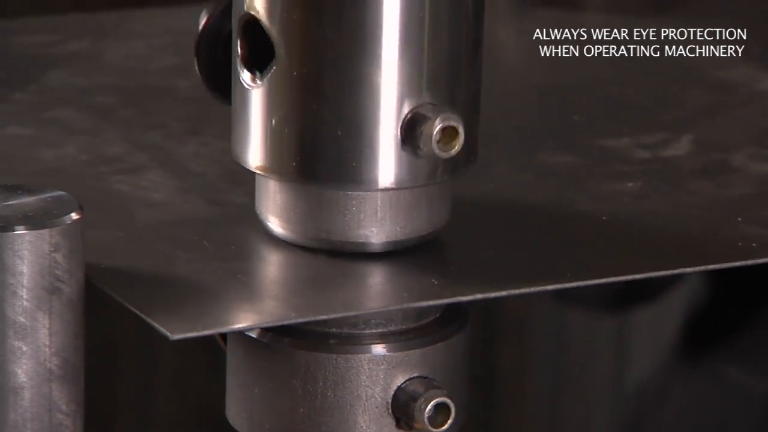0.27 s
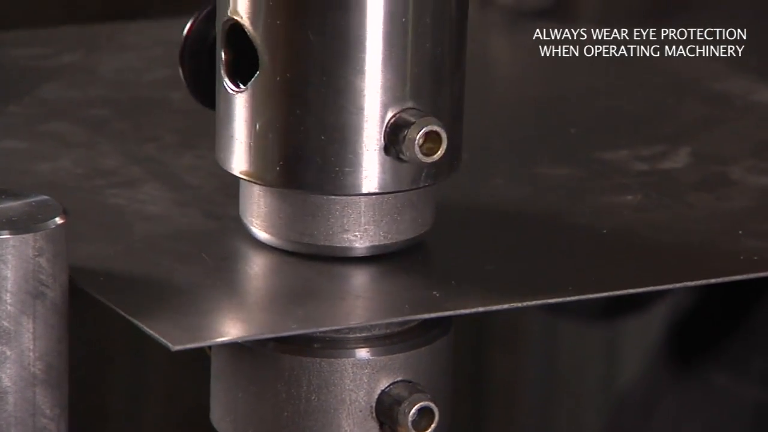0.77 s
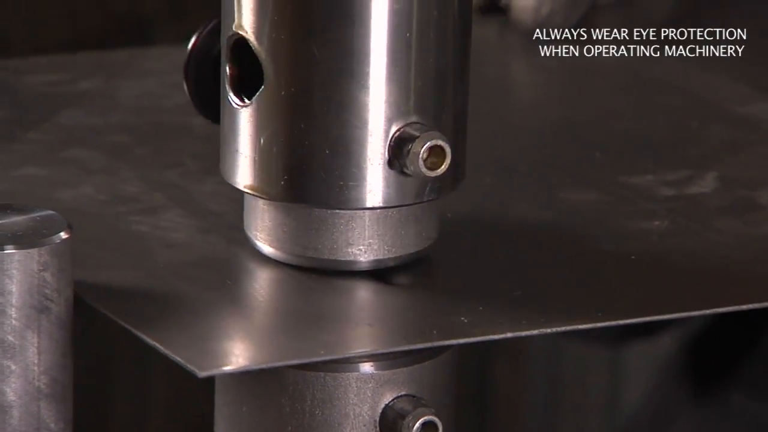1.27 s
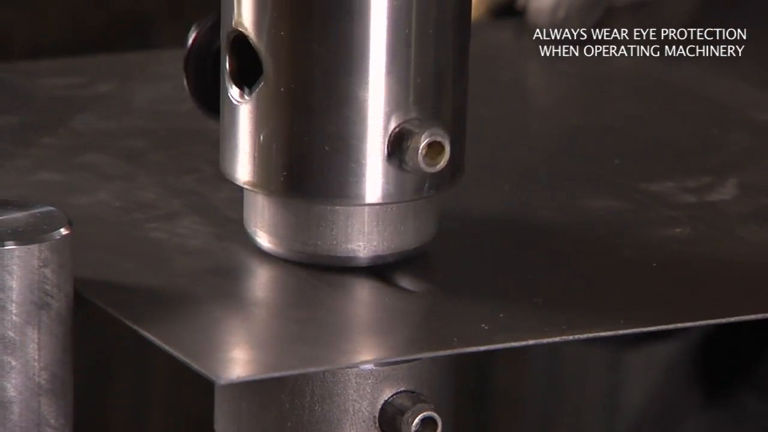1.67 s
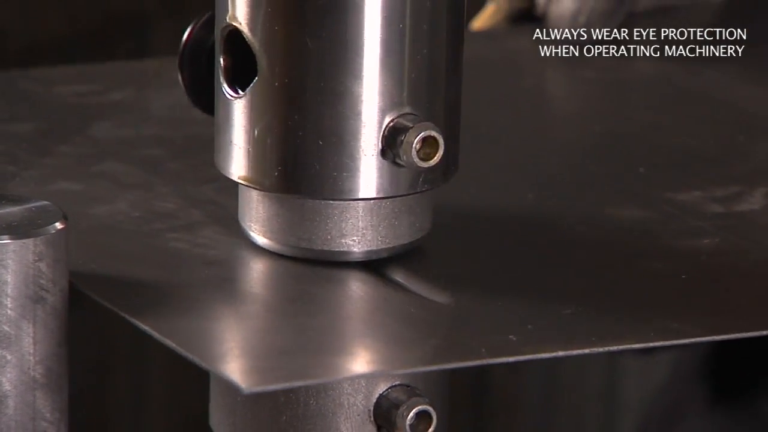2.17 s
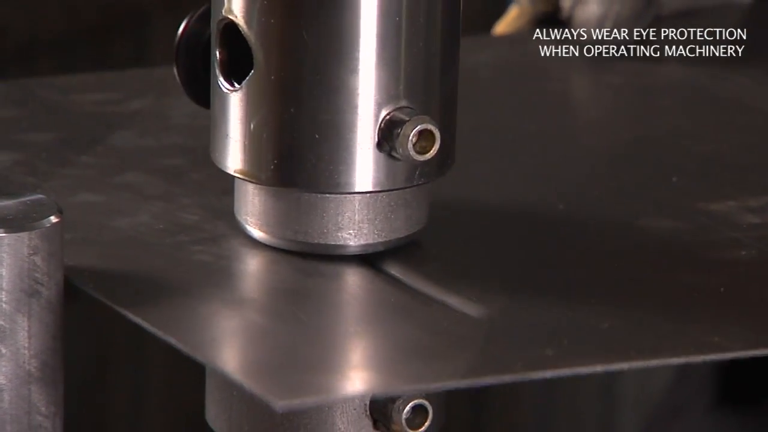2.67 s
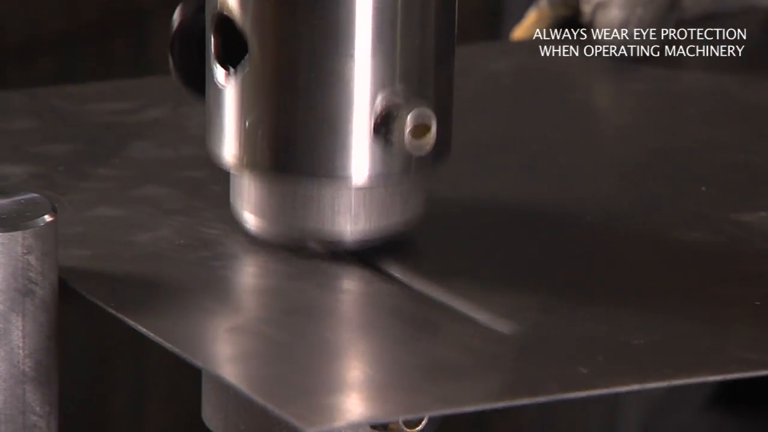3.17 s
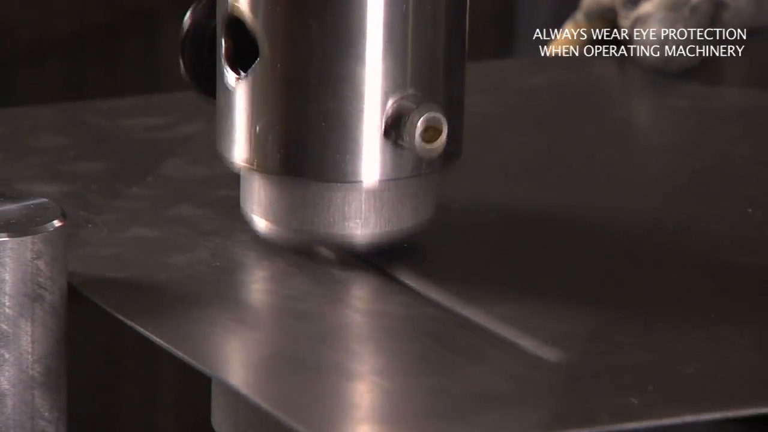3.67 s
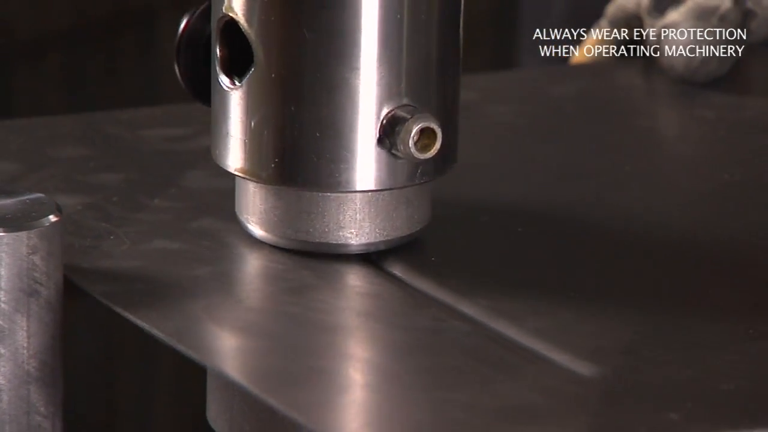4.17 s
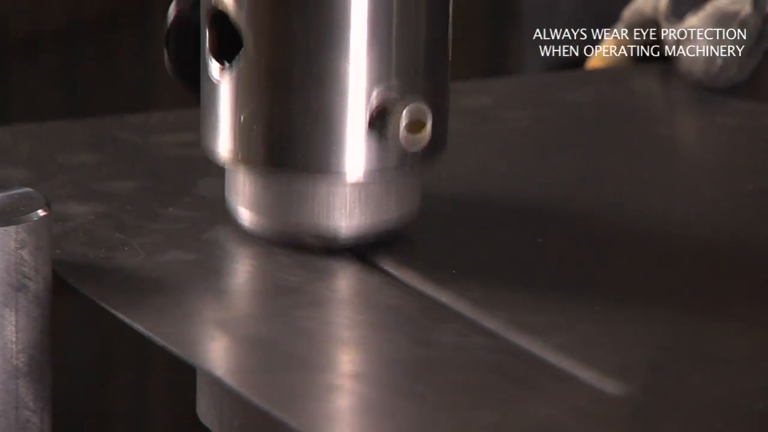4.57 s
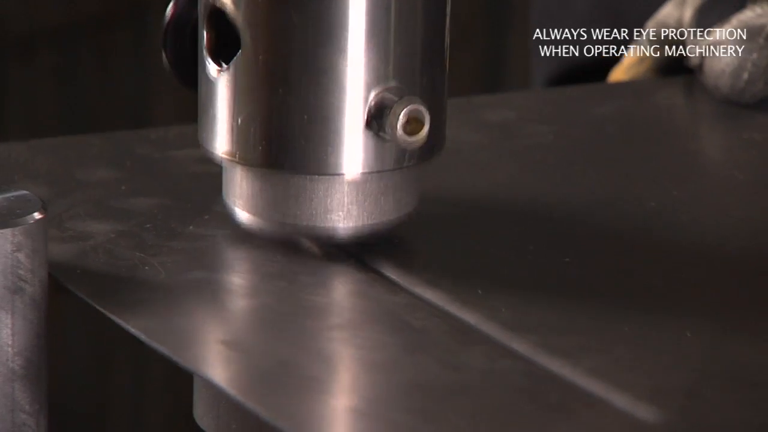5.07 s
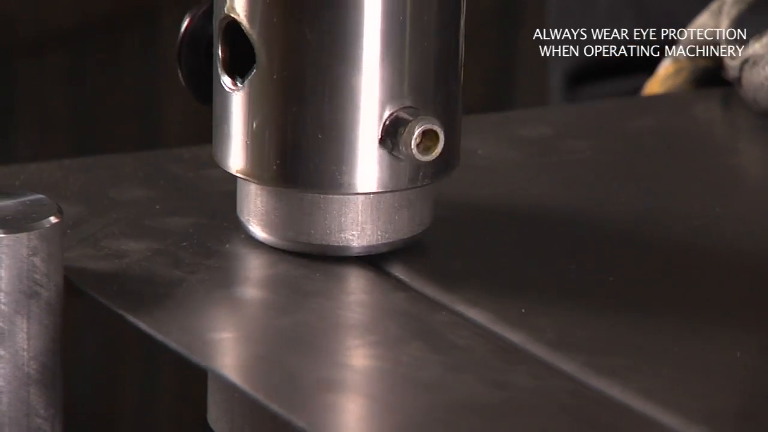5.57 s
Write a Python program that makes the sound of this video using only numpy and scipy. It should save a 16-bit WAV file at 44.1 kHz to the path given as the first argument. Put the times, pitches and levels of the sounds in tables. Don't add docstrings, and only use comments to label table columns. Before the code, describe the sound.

Rapid machine-gun-like clanking of a mechanical hammer on thin metal sheet, with bright clicks, frame knocks and a low motor wash throughout.

```python
import sys
import numpy as np
from scipy import signal
from scipy.fft import rfft, irfft
from scipy.io import wavfile

SR = 44100
rng = np.random.default_rng(int(sys.argv[2]) if len(sys.argv) > 2 else 0)


def store_pcm(level_fs):
    pcm = np.round(np.clip(level_fs, -1, 1) * 32767).astype(np.int16)
    wavfile.write(sys.argv[1], SR, np.atleast_2d(pcm).T)


def boost(x):
    u = np.asarray(x, float) / 20
    return 10 ** u


N = 256662

TURN_S, FIRST_S, TURNS = .0737063, .04735, 82
SETTLE_S, SEAT_S = 0.24, .9
GUIDE_SEAT_DB = -4


def band(x, low_hz, high_hz, order=2):
    sos = signal.butter(order, [low_hz, min(high_hz, .45 * SR)], "band", fs=SR, output="sos")
    return signal.sosfilt(sos, x)


def unit(x):
    return x / np.sqrt(np.mean(x ** 2))


def pulses(s, size):
    at = np.asarray(s) * SR + SR
    i = at.astype(int)
    length = N + 2 * SR
    first = np.bincount(i, size * (1 + i - at), length)
    second = np.bincount(i + 1, size * (at - i), length)
    return (first + second)[SR // 2:N + SR]


def fade(x, seconds, order=1):
    for _ in range(order):
        x = signal.lfilter([1], [1, -np.exp(-1 / (seconds * SR))], x)
    return x[SR // 2:]


def swell(kick, hz, swell_ms):
    ring = fade(kick, 1 / (1000 / swell_ms - 2j * np.pi * hz), order=2).real
    return ring * np.e / (swell_ms / 1000 * SR)


def drift(share, size):
    fresh = rng.standard_normal((TURNS + 40, size))
    return signal.lfilter([np.sqrt(1 - share ** 2)], [1, -share], fresh, axis=0)[40:]


def loose(s, seconds):
    return np.exp(-s / seconds)


def turn_starts(before):
    return FIRST_S + TURN_S * np.arange(-before, TURNS - before)


def knock(table, lag_ms, late_s, wander_db):
    starts, out = turn_starts(2), 0
    starts = starts + lag_ms[np.clip(starts * SR, 0, N - 1).astype(int)] / 1000
    for ms, hz, swell_ms, db in table:
        late, strong = drift(0.81, size=2).T
        kick = pulses(starts + ms / 1000 + late_s * late, boost(db + wander_db * strong))
        out = out + swell(kick, hz, swell_ms)
    return band(out, 221, 9500, order=3)


def drone(modes, t60, wander_db):
    starts, out = turn_starts(6), 0
    for hz, db in modes:
        kick = pulses(starts + TURN_S * rng.random(), boost(wander_db * drift(0.893, size=1)[:, 0]))
        ring = fade(kick, 1 / (np.log(1000) / t60 - 2j * np.pi * hz), order=2).imag
        out = out + boost(db) * unit(ring)
    return out


def clatter():
    # low_hz, high_hz, share [0-1]
    returning = [(20, 200, .9), (200, 450, .7), (450, 1300, .55), (1300, 2200, .5), (2200, 3500, .6),
                 (3500, 5200, .65), (5200, 17000, .45)]
    turn = (np.arange(N) / SR - FIRST_S) / TURN_S + 1
    size = int(TURN_S * SR)
    hz, out = np.fft.rfftfreq(N, 1 / SR), 0
    for low, high, share in returning:
        noise = drift(share, size)[turn.astype(int), (turn % 1 * size).astype(int)]
        out = out + rfft(noise) * ((hz >= low) & (hz < high))
    return irfft(out, N)


def strokes():
    # start_s, ring_db, pitch_hz
    feed = [(0, -8.5, 12270), (.3, -11.5, 11600), (.6, -12, 11800), (.86, -13, 11300), (1.08, -12, 11800),
            (1.45, -14, 11240), (1.7, -11, 12130), (2.1, -11, 12280), (2.35, -14, 11500),
            (2.7, -8.5, 12000), (3.15, -10.5, 11770), (3.45, -11, 11360), (3.95, -8.5, 12400),
            (4.35, -11.5, 11450), (4.68, -9, 12330), (5.0, -11.3, 11000), (5.3, -10, 12280),
            (5.82, -15.5, 11250)]
    late, strong, tone, ring, shake = rng.standard_normal((79, 5)).T
    s = FIRST_S + TURN_S * np.arange(len(late))
    at, db, hz = np.transpose(feed)
    die_db = np.interp(s, at, db) + 0.4 * strong
    pitch_hz = np.interp(s, at, hz) * (1 + .02 * tone)
    slack, unseated = loose(s, SETTLE_S), loose(s, SEAT_S)
    sheet_db = -33 + 7 * slack + 1.2 * s + 0.8 * ring
    bite_s, bite_width_s, bite_db = 1.02, 0.31, 5
    sheet_db = sheet_db + bite_db * np.exp(-((s - bite_s) / bite_width_s) ** 2)
    rattle_db = -30 + 6 * slack + 6.5 * unseated + 0.7 * shake
    late_ms = -.45 + 1.5 * unseated - .13 * s
    return s + late_ms / 1000 + .00012 * late, die_db, pitch_hz, sheet_db, rattle_db


def die_rings(s, db, pitch_hz):
    # pitch_hz, width_hz, level_db
    die_modes = [(7660, 120, -19.5), (8340, 130, -14.5), (9460, 170, -9), (10670, 140, -1),
                 (11600, 120, 2.5), (12000, 110, 4), (13040, 190, 2.5), (15400, 330, -8)]
    # start_s, ring length factor, rise_ms
    landing = [
        (0, 1, .4),
        (.2, .75, .35),
        (1.1, .72, .35),
        (1.25, 1.1, .45),
        (2, 1.1, .45),
        (3, 1.05, .4),
        (4.6, 1.05, .4),
        (5.2, 1.35, .9),
        (5.82, 1.5, 1.3),
    ]
    modes_per_blow = 72
    t = np.arange(3000) / SR
    at_s, longer, rise_ms = np.transpose(landing)
    longer, rise_s = np.interp(s, at_s, longer), np.interp(s, at_s, rise_ms) / 1000
    die_hz, _, die_db = np.transpose(die_modes)
    dies = len(die_modes)
    mode_db = np.r_[die_db, np.full(modes_per_blow - dies, -6)]
    out = np.zeros(N + len(t))
    draws = rng.standard_normal((len(s), 4, modes_per_blow))
    for k, (detune, size, phase, spread) in enumerate(draws):
        hz = np.r_[die_hz * (1 + .008 * detune[:dies]), pitch_hz[k] * (1 + .12 * detune[dies:])]
        hz = np.clip(hz, 5000, 16500)
        gain = boost(mode_db + 1.9 * size)
        t60 = 0.026 * (11500 / hz) ** 1.3 * boost(0.52 * spread) * longer[k]
        decay = np.exp(-np.log(1000) * t / t60[:, None])
        tones = decay * np.sin(2 * np.pi * hz[:, None] * t + 3 * phase[:, None])
        ring = (gain / np.linalg.norm(gain)) @ tones
        at = int(s[k] * SR)
        rise = np.minimum(t / rise_s[k], 1)
        out[at:at + len(t)] += boost(db[k] - 2.0) * ring * rise / np.sqrt(longer[k])
    return out[:N]


def crack(s, db):
    # pitch_hz, swell_ms, level_db
    snap_modes = [(5100, .45, 4.5), (6200, .4, 0), (7900, .35, -6)]
    kick = pulses(s + .6 / 1000, boost(db))
    snaps = sum(boost(gain_db) * swell(kick, hz, ms) for hz, ms, gain_db in snap_modes)
    return boost(17) * band(kick, 3000, 11000)[SR // 2:] + snaps


def blows(noise, slack):
    s, die_db, pitch_hz, sheet_db, rattle_db = strokes()
    fresh = rng.standard_normal(N)
    sheet = fade(pulses(s + 0.00032, boost(sheet_db - 0.5)), 0.0091) * unit(band(fresh, 6300, 12240, order=3))
    click = fade(pulses(s + 0.000694, boost(sheet_db + 3.5)), 0.0012) * unit(band(fresh, 3900, 8540))
    click = click + crack(s, sheet_db - 1)
    click = click + fade(pulses(s, boost(die_db - 21)), 0.0012) * unit(band(fresh, 15600, 16800))
    rattle = fade(pulses(s + 0.0024, boost(rattle_db - 2.5) * np.e / (0.0056 * SR)), 0.0041, order=2)
    slap = fade(pulses(s + .0072, boost(rattle_db - 4.5)), 0.0017)
    rattling = (rattle + slap) * unit(band(noise, 1900, 4700))
    buzz = fade(pulses(s + 0.0046, np.e / (0.0042 * SR)), 0.0069, order=2)
    buzz = buzz * boost(-38.5 + 13 * slack) * unit(band(fresh, 640, 2100))
    return die_rings(s, die_db, pitch_hz) + sheet + click + buzz + rattling


def frame(t, slack, unseated, lag_ms):
    # after_blow_ms, pitch_hz, swell_ms, level_db
    column_modes = [(0.13, 222, 13.3, -28.0), (1.95, 228, 4.8, -26.4), (3.12, 332, 12.2, -24.9),
                    (3.76, 281, 3.5, -35.6), (10.7, 379, 9.1, -23.2), (11.42, 220, 8.2, -22.0),
                    (19.32, 316, 2.0, -15.0), (29.66, 305, 2.9, -29.4), (37.42, 294, 2.1, -20.8),
                    (49.06, 439, 37.4, -41.3), (59.37, 221, 2.2, -24.1), (61.06, 251, 2.3, -25.2),
                    (63.0, 286, 2.0, -23.1), (64.13, 290, 5.9, -29.5), (69.45, 274, 1.0, -30.8)]
    # after_blow_ms, pitch_hz, swell_ms, level_db
    knocks = [(-3.73, 554, 3.3, -35.3), (1.26, 873, 7.3, -32.4), (4.04, 1031, 9.8, -34.5),
              (6.53, 504, 3.6, -37.9), (7.72, 1209, 0.8, -25.0), (10.25, 982, 39.9, -33.5),
              (10.63, 1273, 25.4, -44.0), (9.9, 1845, 2.6, -23.5), (10.92, 605, 22.8, -35.3),
              (11.63, 657, 60.3, -36.9), (11.81, 822, 2.9, -28.8), (12.0, 725, 25.6, -37.6),
              (12.55, 533, 53.7, -36.7), (21.7, 942, 1.7, -26.9), (24.28, 502, 1.6, -30.4),
              (34.85, 1821, 9.1, -34.8), (39.57, 1307, 0.9, -26.7), (40.73, 585, 11.0, -38.3),
              (40.96, 838, 10.9, -29.8), (41.62, 885, 13.6, -45.6), (42.69, 1728, 0.8, -20.9),
              (43.68, 757, 1.0, -23.2), (45.37, 1469, 1.5, -30.7), (46.53, 1528, 2.4, -33.5),
              (47.16, 1816, 1.6, -28.4), (48.37, 1006, 7.7, -33.6), (51.41, 1722, 3.1, -29.0),
              (51.98, 1272, 4.5, -30.1), (52.03, 805, 2.4, -25.2), (60.14, 1285, 24.2, -39.9),
              (60.62, 985, 4.5, -27.2), (60.85, 2044, 2.8, -40.6), (63.15, 1471, 1.2, -33.1)]
    long_ms, bright_hz = 20, 1450
    column = knock(column_modes, lag_ms, 2e-5, wander_db=0.4)
    foot = signal.sosfiltfilt(signal.butter(N=4, Wn=212, fs=SR, output="sos"), column)
    column = column - (1 - boost(-12 * unseated)) * foot
    thump = boost(-0.05 - 4.5 * slack + 4.5 * unseated) * column
    mid = knock([k for k in knocks if k[1] < bright_hz and k[2] <= long_ms], lag_ms, 2.5e-5, wander_db=1.0)
    rings = knock([k for k in knocks if k[2] > long_ms], lag_ms, 3e-5, wander_db=1.0)
    guides = knock([k for k in knocks if k[1] >= bright_hz and k[0] > 20], lag_ms, 2.5e-5, wander_db=0.9)
    ping = knock([k for k in knocks if k[1] >= bright_hz and k[0] <= 20], lag_ms, 4e-5, wander_db=0.6)
    out = thump + mid + boost(-7 * unseated) * rings + boost(GUIDE_SEAT_DB * unseated) * guides
    return out + boost(-3 + 2 * slack + 0.78 * t) * ping


def thump_tones(t, lag_ms):
    # start_s, width_s, after_blow_ms, pitch_hz, level_db
    low_tones = [(.12, .15, 11.33, 360, -27), (.12, .15, 12.6, 270, -25), (.45, .25, 11.51, 370, -29),
                 (.45, .25, 12.87, 280, -24), (.95, .4, 12.7, 280, -23), (.95, .4, 10.56, 340, -31),
                 (1.8, .6, 12.7, 280, -27), (5.4, .5, 12.83, 280, -24), (5.4, .5, 11.17, 370, -29)]
    out = 0
    for s, width, ms, hz, db in low_tones:
        mode = knock([(ms, hz, 6, db)], lag_ms, 1.5e-5, wander_db=.6)
        out = out + np.exp(-((t - s) / width) ** 2) * mode
    return out


def linkage(noise):
    # after_blow_ms, centre_hz, width_hz, t60_s, level_db
    ticks = [(18.5, 2700, 1400, 0.02, -39), (39.3, 7740, 4300, 0.022, -35.5),
             (39.1, 10000, 3000, .025, -48), (50, 10500, 3000, .03, -50), (52.6, 10700, 1700, 0.04, -46),
             (43, 13500, 3500, .02, -62), (40.4, 3570, 3560, 0.018, -35), (49.6, 7200, 2500, 0.042, -39),
             (51.9, 2450, 2000, 0.026, -36), (53.35, 4050, 3200, 0.013, -36),
             (56.8, 4300, 2400, 0.013, -37), (57.8, 2720, 3000, 0.033, -41), (60.7, 4160, 1340, 0.02, -40)]
    starts, out = turn_starts(2), 0
    for ms, hz, width, t60, db in ticks:
        strong = drift(0.44, size=1)[:, 0]
        shape = fade(pulses(starts + ms / 1000, boost(db + 1.05 * strong)), t60 / np.log(1000))
        out = out + shape * unit(band(noise, hz - width / 2, hz + width / 2))
    return out


def pin_taps(slack, lag_ms):
    # after_blow_ms, pitch_hz, swell_ms,
    # level_db
    small_taps = [(-7.33, 3620, 0.8, -41.5), (-5.42, 2070, 0.8, -38.8), (-3.34, 2370, 0.8, -37.6),
                  (2.56, 2800, 0.8, -31.8), (3.74, 3190, 0.8, -32.3), (6.28, 2760, 0.8, -26.9),
                  (6.91, 3920, 0.8, -30.0), (11.18, 3790, 0.8, -34.9), (12.27, 2760, 0.8, -36.2),
                  (12.45, 4610, 0.8, -39.0), (14.26, 3790, 0.8, -36.4), (16.8, 4220, 0.8, -39.0),
                  (18.25, 2070, 0.8, -31.5), (18.98, 3920, 0.8, -38.7), (20.79, 3920, 0.8, -41.4),
                  (25.42, 3570, 0.8, -40.3), (29.32, 4740, 0.8, -42.1), (29.68, 4310, 0.8, -42.4),
                  (31.77, 4130, 0.8, -41.5), (36.39, 3790, 0.8, -41.7), (39.75, 8350, 0.8, -39.0),
                  (39.84, 4520, 0.8, -36.5), (40.2, 3400, 0.8, -34.0), (40.75, 6240, 0.8, -44.5),
                  (41.38, 4050, 0.8, -34.1), (44.83, 4090, 0.8, -40.9), (46.73, 3920, 0.8, -42.0),
                  (48.91, 3360, 0.8, -39.5), (49.36, 8480, 0.8, -43.1), (49.54, 7020, 0.8, -37.1),
                  (51.9, 7190, 0.8, -41.7), (52.72, 3530, 0.8, -36.7), (53.72, 4650, 0.8, -34.9),
                  (54.35, 7450, 0.8, -44.3), (54.9, 3320, 0.8, -29.6), (56.35, 4260, 0.8, -34.5),
                  (57.07, 2710, 0.8, -32.0), (60.88, 2150, 0.8, -31.4), (61.52, 3660, 0.8, -34.2),
                  (64.06, 3270, 0.8, -40.9), (64.69, 4480, 0.8, -41.6), (66.23, 3660, 0.8, -41.5),
                  (3.5, 1800, 2.5, -31)]
    return boost(GUIDE_SEAT_DB * slack) * knock(small_taps, lag_ms, 1.2e-5, wander_db=1.4)


def overhang(t):
    # start_s, width_s, pitch_hz, level_db
    sheet_modes = [(0.086, 0.22, 515, -43.5), (1.3, .55, 855, -37), (2.2, 0.33, 855, -44.5),
                   (2.2, 0.9, 746, -43), (4.3, 1, 746, -48), (3.9, 0.22, 990, -50), (4.2, 0.86, 580, -51),
                   (1.46, .6, 500, -49), (3.06, 0.98, 490, -52), (5.5, 0.43, 760, -42.5),
                   (4.97, .3, 450, -44), (5.46, 0.44, 390, -45), (4.3, .4, 340, -42)]
    out = 0
    for s, width, hz, db in sheet_modes:
        out = out + np.exp(-((t - s) / width) ** 2) * drone([(hz, db)], .17, wander_db=1.5)
    return out


def frame_hum(slack):
    # pitch_hz, level_db
    frame_modes = [(1437, -53), (1642, -53.5), (1723, -50), (1790, -50), (2360, -54), (3700, -53),
                   (4870, -55)]
    # pitch_hz, level_db
    stand_modes = [(203.5, -49), (231, -60)]
    stand = boost(-5 * slack) * drone(stand_modes, 2.07, wander_db=1.7)
    return boost(-4.0) * drone(frame_modes, 0.49, wander_db=1.7) + stand


def boom(t):
    return boost(-52 + 23.5 * loose(np.abs(t - .1), SETTLE_S)) * drone([(325, 0)], 0.27, wander_db=-0.5)


def ground(shifted):
    # pitch_hz, level_db
    floor_modes = [(27, -71), (81, -67), (95, -64.5), (122, -63.5), (136, -57), (149, -60), (163, -61),
                   (176, -62), (190, -60)]
    air = boost(-60.5) * unit(band(rng.standard_normal(N), 22, 180))
    return boost(0.2 + 3.5 * shifted) * (drone(floor_modes, 1.17, wander_db=-0.2) + air)


def shop(noise):
    # pitch_hz, level_db [dB per Hz]
    wash_curve = [(15, -65), (25, -42.5), (92, -26), (190, -22), (300, -11.5), (433, -10), (600, -12),
                  (900, -9.5), (1200, -10), (1550, -11.5), (1780, -12.5), (2040, -13.5), (2900, -19),
                  (3700, -20.5), (5720, -22), (8830, -28), (11900, -33), (13500, -38), (15200, -42),
                  (16500, -48)]
    # pitch_hz, width_hz, level_db
    panels = [(2360, 240, 5), (3700, 250, 6.5), (4840, 270, 7), (7400, 350, 3)]
    hz = np.fft.rfftfreq(N, 1 / SR)
    curve_hz, curve_db = np.transpose(wash_curve)
    db = np.interp(np.log(hz + 1), np.log(curve_hz), curve_db)
    for at, width, peak_db in panels:
        db = db + peak_db / (1 + (2 * (hz - at) / width) ** 2)
    return unit(irfft(rfft(noise) * boost(db), N))


def sinking(wash, t):
    since = 2 * (t - FIRST_S) / TURN_S % 1
    high = signal.butter(N=2, Wn=1500, btype="high", fs=SR, output="sos")
    treble = signal.sosfiltfilt(high, wash)
    return wash + (boost(4 * (.4 - since ** 2)) - 1) * treble


def scene():
    t = np.arange(N) / SR
    shift_s, shift_rise_s = 5.05, 0.09
    shifted = 1 / (1 + np.exp(-(t - shift_s) / shift_rise_s))
    slack, unseated = loose(t, SETTLE_S), loose(t, SEAT_S)
    lag_ms = -0.042 + 1.12 * loose(t, 0.89) + .45 * shifted
    noise = clatter()
    hammer = blows(noise, slack) + frame(t, slack, unseated, lag_ms) + thump_tones(t, lag_ms)
    joints = linkage(noise) + pin_taps(slack, lag_ms)
    body = overhang(t) + frame_hum(slack) + boom(t)
    background = ground(shifted) + boost(-34.5) * sinking(shop(noise), t)
    return (hammer + joints + body + background)[None]


def band_limit(x):
    return signal.sosfilt(signal.butter(12, 16970, fs=SR, output="sos"), x)


def low_pass(x, hz):
    return signal.sosfiltfilt(signal.ellip(8, .1, 40, hz, fs=SR, output="sos"), x)


def record(dry):
    limit, above_db = .6, -19
    dry = limit * np.tanh(dry / limit)
    mix = low_pass(dry, 15650) * (1 - boost(above_db)) + boost(above_db) * low_pass(dry, 16750)
    return band_limit(mix)


dry = scene()
out = record(dry)
store_pcm(out)
```